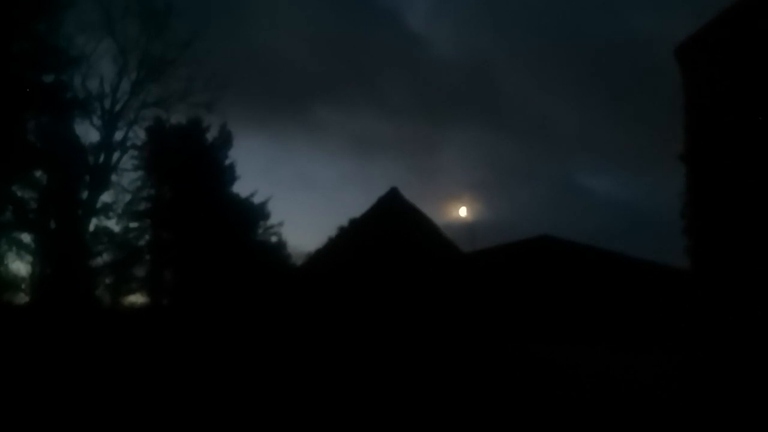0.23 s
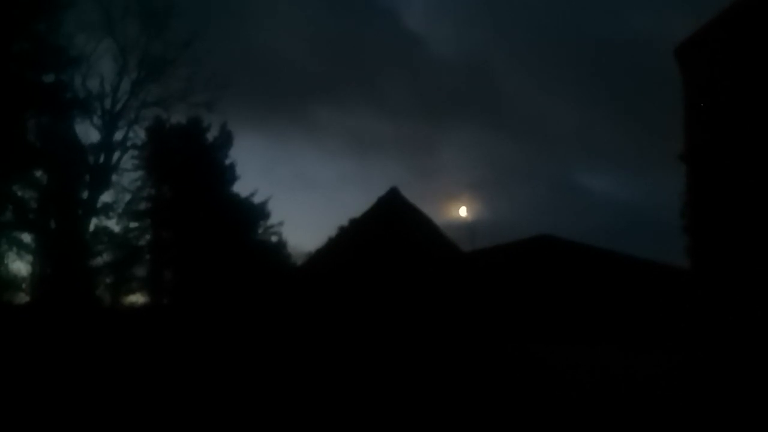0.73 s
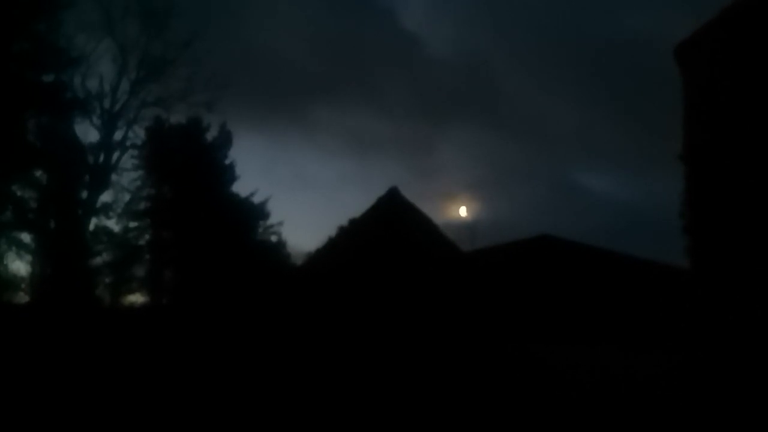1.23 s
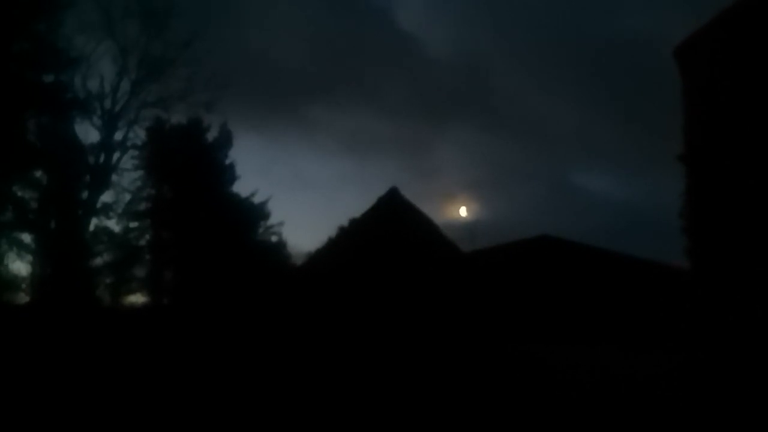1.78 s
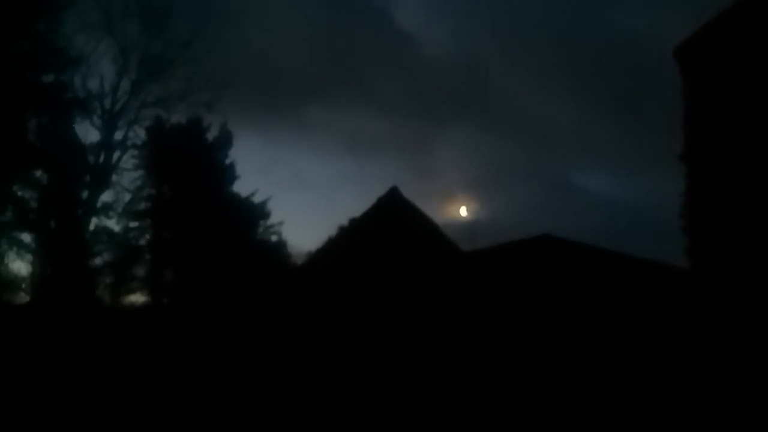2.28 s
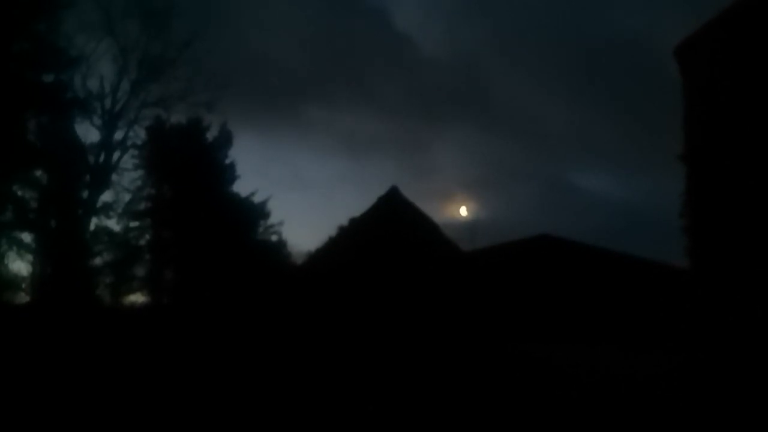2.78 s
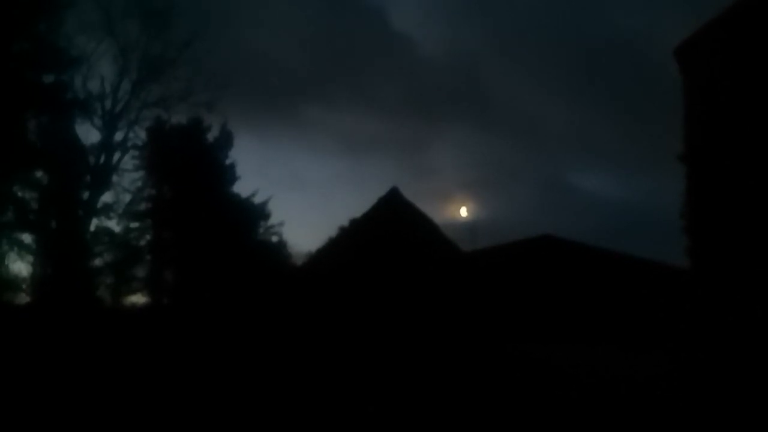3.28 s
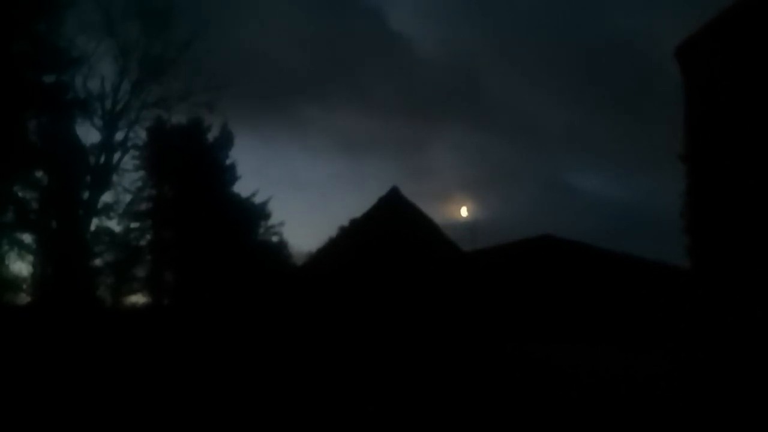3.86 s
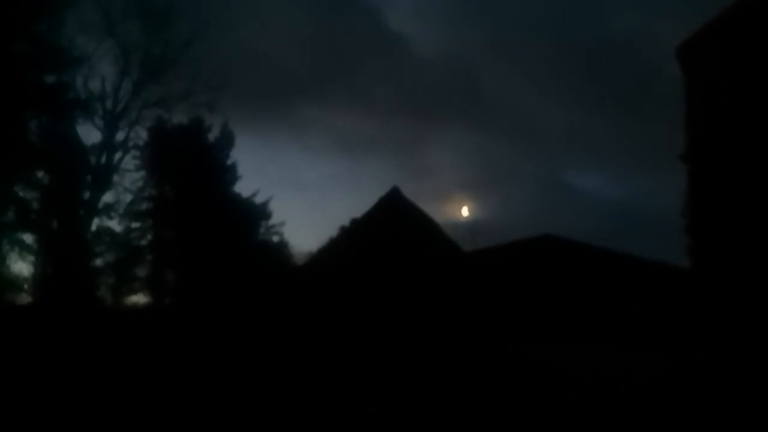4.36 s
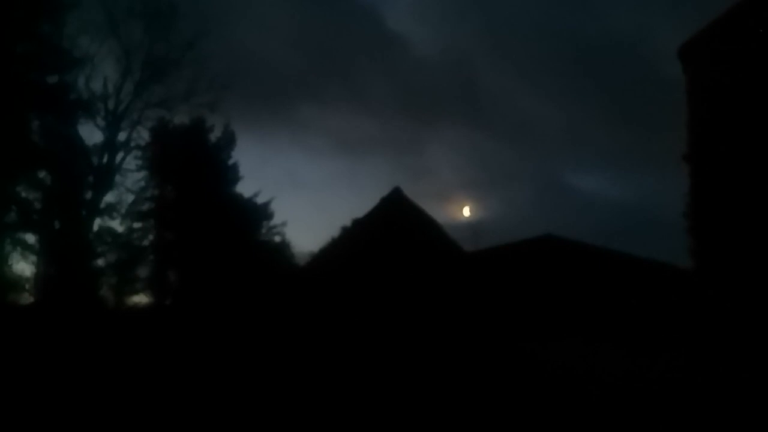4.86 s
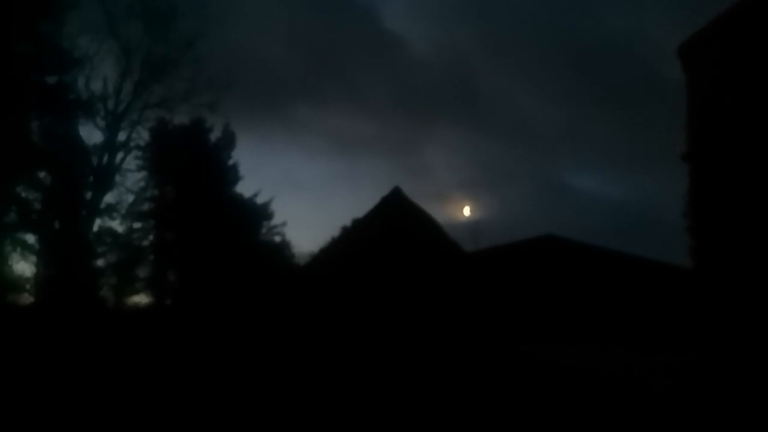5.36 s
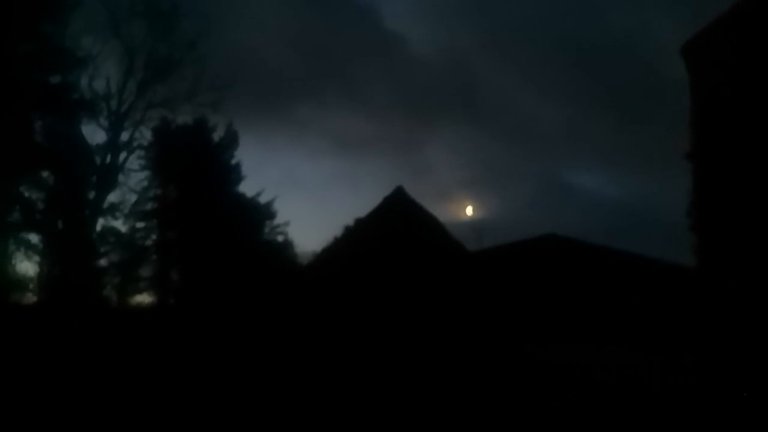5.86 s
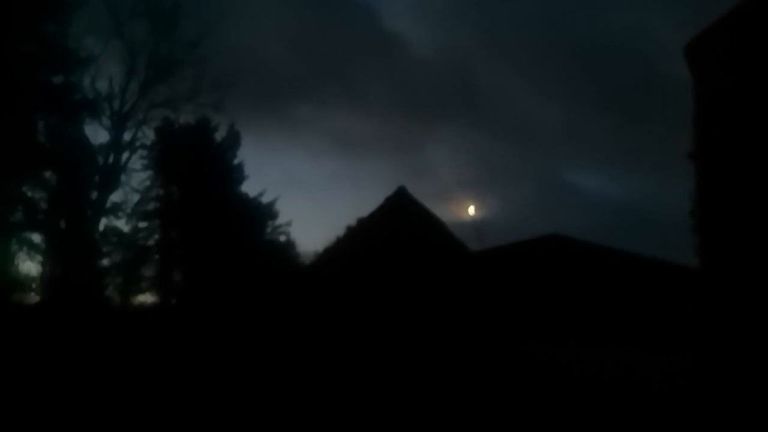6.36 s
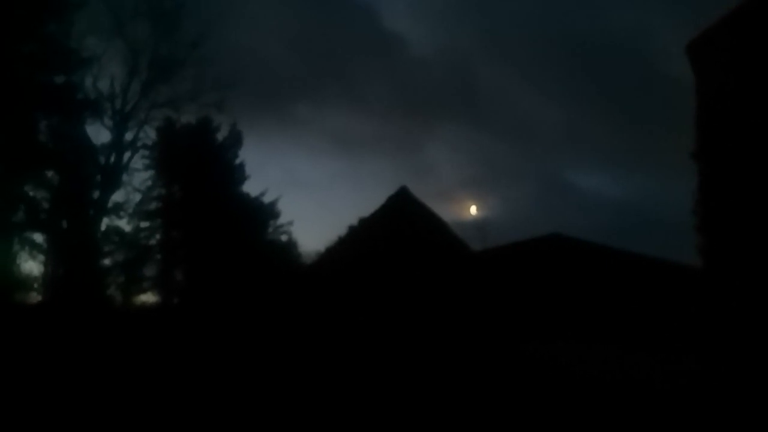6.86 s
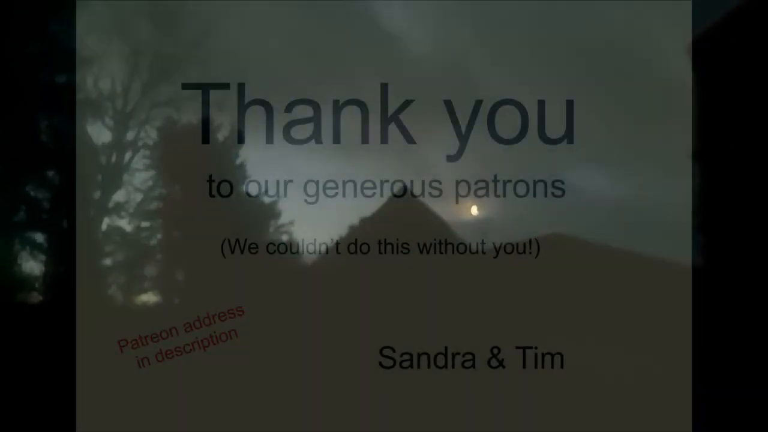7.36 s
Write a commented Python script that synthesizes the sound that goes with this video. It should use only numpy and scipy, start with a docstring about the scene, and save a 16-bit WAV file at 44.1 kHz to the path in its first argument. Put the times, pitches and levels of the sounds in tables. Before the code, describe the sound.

In a still farmyard at dawn, distant chirps flare and fade under soft knocks and clear piping. A thrush repeats a slurred whistle, high twittering follows, then a robin sings close on the right among wheezes and a fluting blackbird. Sharp whipping calls and a slowing trill come later. Walls and trees echo the birds over faint rumble, hum and hiss.

```python
"""Dawn chorus in a farmyard, in still air, over noise-band rumble, hum and hiss; walls and trees echo each call.
A flurry of far chirps fades at once amid soft knocks (noise bursts), hedge piping and single blackbird flutes.
A thrush repeats a slurred whistle, two-voiced arches twitter, then a robin close on the right sings bent tones
among trembling wheezes and buzzes and a blackbird phrase that follows a pitch curve. A far whistle sinks, the
blackbird resumes, the robin's upsweeps whip, a two-voiced trill slows and fades, and soft knocks return."""
import sys
import numpy as np
from scipy import signal
from scipy.fft import rfft, irfft, next_fast_len
from scipy.io import wavfile
from scipy.ndimage import uniform_filter1d, map_coordinates

SR = 44100
rng = np.random.default_rng(int(sys.argv[2]) if len(sys.argv) > 2 else 0)


def dump(signal):
    """Clip the signal to [-1, 1] and save it as 16-bit WAV at the path in sys.argv[1]."""
    limited = np.clip(np.atleast_2d(signal).T, -1, 1)
    pcm = np.round(limited * 32767).astype(np.int16)
    wavfile.write(sys.argv[1], SR, pcm)


N = 336042


def amp(db):
    """Decibels to amplitude gain."""
    return 10 ** (np.asarray(db) / 20)


def unit(x):
    """Scale to rms 1."""
    return x / np.sqrt(np.mean(x ** 2) + 1e-20)


def along(points, hz):
    """Read (freq_hz, value) points on a log frequency axis."""
    point_hz, value = np.transpose(points)
    return np.interp(np.log(hz + 1), np.log(point_hz + 1), value)


def wobble(knots_per_s, size):
    """Smooth random curve: a spline through Gaussian knots."""
    knots = rng.standard_normal(2048)
    return map_coordinates(knots, [np.arange(size) * knots_per_s / SR], mode="wrap")


def filtered(x, response):
    """Multiply the spectrum of x by a response of frequency."""
    size = next_fast_len(N + SR // 4)
    hz = np.fft.rfftfreq(size, 1 / SR)
    return irfft(rfft(x, size) * response(hz), size)[..., :N]


def late(x, delay_ms):
    """Delay x by whole samples."""
    return np.pad(x, (round(delay_ms * SR / 1000), 0))[:N]


def add(track, start_s, sound):
    """Mix a sound into a track in place."""
    part = track[max(round(start_s * SR), 0):][:len(sound)]
    part += sound[:len(part)]


def sides(right_db):
    """Left and right gains of mean power 1; right_db is right over left."""
    return unit(amp([[0], [right_db]]))


# Channel correlation of the noises: freq_hz, correlation (-1 to 1)
STEREO_CORRELATION = [(30, 0.99), (60, 1), (130, 0.92), (260, 0.56), (550, -0.67), (1100, -0.11),
                      (4000, 0.02)]


def rush(spectrum):
    """Stereo noise of rms 1; mid and side shares set the channel correlation at each frequency."""
    def mid_side_response(hz):
        angle = np.arccos(np.clip(along(STEREO_CORRELATION, hz), -1, 1)) / 2
        return amp(along(spectrum, hz)) * [np.cos(angle), np.sin(angle)]
    mid, side = filtered(rng.standard_normal((2, N)), mid_side_response)
    return unit(np.array([mid + side, mid - side]))


def whistle(hz, waver, knots_per_s):
    """One side of the syrinx: a sine of rms 1 whose pitch trembles by the fraction waver."""
    pitch_hz = hz * (1 + waver * wobble(knots_per_s, len(hz)))
    return np.sqrt(2) * np.sin(2 * np.pi * np.cumsum(pitch_hz) / SR)


def bent(rows, start_ratio, end_ratio):
    """Give (start_s, length_s, middle_hz, level_db) rows one shared pitch bend."""
    return [(s, length_s, hz * start_ratio, hz, hz * end_ratio, db) for s, length_s, hz, db in rows]


def sing(notes, waver, knots_per_s, taper=0.37):
    """Notes (start_s, length_s, start_hz, middle_hz, end_hz, level_db) bend parabolically, with tapered ends."""
    song = np.zeros(N)
    for s, length_s, start_hz, middle_hz, end_hz, db in notes:
        u = np.linspace(0, 1, max(int(length_s * SR), 64))
        parabola = np.polyfit([0, 0.5, 1], [start_hz, middle_hz, end_hz], 2)
        tone = whistle(np.polyval(parabola, u), waver, knots_per_s)
        add(song, s, amp(db) * signal.windows.tukey(len(u), taper) * tone)
    return song


def upper_voice(notes, ratio, stretch, gain_db):
    """The other side of the syrinx: the same arch, higher, with its length scaled about its centre."""
    return [(s - length_s * (stretch - 1) / 2, length_s * stretch, a * ratio, b * ratio, c * ratio, db + gain_db)
            for s, length_s, a, b, c, db in notes]


def phrase(curve, gain_db, waver, knots_per_s):
    """One unbroken warble along a (time_s, pitch_hz, level_db) curve."""
    song = np.zeros(N)
    when_s, hz, db = np.transpose(curve)
    t = np.arange(when_s[0], when_s[-1], 1 / SR)
    tone = whistle(np.interp(t, when_s, hz), waver, knots_per_s)
    level = amp(gain_db + np.interp(t, when_s, db))
    add(song, when_s[0], level * signal.windows.tukey(len(t), 0.04) * tone)
    return song


def yard(song, right_db, wet_db, walls_t60_s, trees_db, trees_t60_s=2.25, echo_right_db=3, build_s=0.0015):
    """Direct sound, a quick scatter from walls and a long one from trees; treble dies sooner."""
    hz, t, noise = signal.stft(rng.standard_normal((2, SR)), SR, nperseg=256)
    air_loss_db = 30 * t * (hz[:, None] / 8000) ** 2
    walls = amp(-60 * t / walls_t60_s)
    trees = amp(trees_db - 60 * t / trees_t60_s)
    decay = (walls + trees) * (1 - np.exp(-t / build_s))
    tail = signal.istft(noise * decay * amp(-air_loss_db), SR, nperseg=256)[1]
    tail /= np.sqrt(np.sum(decay ** 2) * t[1] * SR)
    echo = signal.fftconvolve(song[None], tail, axes=1)[:, :N]
    direct = sides(right_db) * np.array([late(song, delay_ms=0.57), song])  # left lags
    return (direct + amp(wet_db) * sides(echo_right_db) * echo) / np.hypot(1, amp(wet_db))


# Distant rumble spectrum: freq_hz, relative_db_per_hz
RUMBLE_SPECTRUM = [(12, -28), (20, -1), (29, 2.5), (39, -10), (60, -8.5), (85, -8), (125, -10),
                   (200, -15.5), (300, -20), (450, -24), (700, -32), (1300, -100)]
# Hiss spectrum: freq_hz, relative_db_per_hz
HISS_SPECTRUM = [(300, -14), (550, 1.5), (1000, 4), (1600, 2), (3000, -8), (5000, -5), (7000, -6.5),
                 (9000, -11), (15500, -11)]


def background(rumble_db=-58, hum_db=-59, hiss_db=-64):
    """Steady noises: distant rumble, a narrow wavering band near 50 Hz as hum, and hiss."""
    hum = rush([(20, -60), (42, -18), (50, -2), (54, 0), (66, -17), (130, -70), (400, -120)])
    return amp(rumble_db) * rush(RUMBLE_SPECTRUM) + amp(hum_db) * hum + amp(hiss_db) * rush(HISS_SPECTRUM)


# Soft knocks: start_s, fall_30db_s, level_db
SOFT_KNOCKS = [(0.024, 0.049, -55), (0.262, 0.039, -50), (7.104, 0.17, -46), (7.123, 0.086, -80)]
# Small dry ticks: start_s, level_db
DRY_TICKS = [(1.249, -61), (3.982, -51), (7.547, -57)]
# Knock spectrum: freq_hz, relative_db
KNOCK_SPECTRUM = [(40, -1), (90, -3), (280, 0), (480, -11), (800, -1.5), (1400, -16.5), (2000, -3.5),
                  (3500, -42), (8000, -63)]


def knocks():
    """Dull bumps and dry ticks close to the microphone: decaying bursts of coloured noise."""
    t = np.arange(SR // 2) / SR
    bumps, ticks = np.zeros(N), np.zeros(N)
    for s, fall_30db_s, db in SOFT_KNOCKS:
        add(bumps, s, amp(db - 30 * t / fall_30db_s) * (1 - np.exp(-t / 0.0013)))
    for s, db in DRY_TICKS:
        add(ticks, s, amp(db - 60 * t / 0.02))
    tick_noise = rush([(2000, -31), (4500, 2), (7000, 9), (10000, -39)])
    return sides(3.4) * (bumps * rush(KNOCK_SPECTRUM) + ticks * tick_noise)


# Distant chorus spectrum: freq_hz, relative_db_per_hz
FAR_SPECTRUM = [(1200, -17), (1750, -2.5), (2400, -3.5), (3600, -2.5), (4500, -13), (6000, -15.5),
                (7500, -26.5), (9000, -49)]


def far_chorus(count=160, level_db=-60.5, swell_db=-1, chirps_db=-9, patchy_db=3, flurry_db=9, flurry_s=0.18):
    """Many distant birds: faint echoing chirps in a shimmering noise wash, with an opening flurry that dies away."""
    notes = []
    for when, length, height, bend, fall, strength in rng.random((count, 6)):
        hz = 2000 * 3 ** height
        start_hz = hz * (1 + 0.307 * (bend - 0.5))
        end_hz = hz * (1 + 0.42 * (fall - 0.5))
        notes.append((when * N / SR, 0.0198 + 0.041 * length, start_hz, hz, end_hz, 6 * strength))
    song = filtered(sing(notes, waver=0.02, knots_per_s=320), lambda hz: amp(along(FAR_SPECTRUM, hz)))
    chirps = unit(yard(song, right_db=-7, wet_db=11, walls_t60_s=0.57, trees_db=-8))

    grid = signal.stft(rush(FAR_SPECTRUM), nperseg=512)[2]
    patches = uniform_filter1d(rng.standard_normal(grid.shape[1:]), size=3, axis=0)  # across frequency
    patches = uniform_filter1d(patches, size=16, axis=1)  # across time
    wash = unit(signal.istft(grid * amp(patchy_db * unit(patches)), nperseg=512)[1][:, :N])

    flurry = flurry_db * np.exp(-np.arange(N) / SR / flurry_s)
    gain = amp(level_db + swell_db * wobble(3.16, N) + flurry)
    return gain * (sides(0.93) * wash + amp(chirps_db) * chirps)


# Whistle that sinks as it swells: time_s, pitch_hz, level_db (before gain_db)
FAR_WHISTLE_CURVE = [(5.27, 7300, -70), (5.47, 7070, -60.5), (5.55, 7110, -62)]


def far_whistle():
    """A thin high far note: one sine along a sinking pitch curve."""
    song = phrase(FAR_WHISTLE_CURVE, gain_db=-1, waver=0.01, knots_per_s=300)
    return yard(song, right_db=23, wet_db=5, walls_t60_s=0.3, trees_db=-14)


# Wheezes, which arch up and sink back: start_s, length_s, middle_hz, level_db
WHEEZE_NOTES = [(1.395, 0.069, 3870, -50), (3.055, 0.086, 5355, -51.5), (3.095, 0.15, 5780, -60),
                (3.38, 0.052, 5900, -56), (3.575, .15, 5240, -51.5), (3.585, .2, 5980, -57.5),
                (3.87, .11, 8600, -68.5), (4.55, 0.15, 4320, -60)]
# Buzzes: start_s, length_s, middle_hz, end_over_start_pitch, level_db
BUZZ_NOTES = [(2.526, 0.058, 3633, 1.6, -46.5), (2.61, .11, 4290, 1.5, -55), (3.34, .28, 6740, .87, -63.5),
              (4.22, 0.13, 5410, 0.6, -63), (6.699, 0.103, 4685, 1.03, -56), (7.268, .22, 7200, 1, -70.5),
              (7.324, 0.27, 3990, 0.99, -58.5)]


def buzzes():
    """A fast tremble spreads each tone into a band: slight in the wheezes, deep in the buzzes."""
    wheezes = bent(WHEEZE_NOTES, start_ratio=0.94, end_ratio=0.94)
    glides = [(s, length_s, hz / np.sqrt(rise), hz, hz * np.sqrt(rise), db)
              for s, length_s, hz, rise, db in BUZZ_NOTES]
    song = sing(wheezes, waver=0.021, knots_per_s=520) + sing(glides, waver=0.062, knots_per_s=700)
    return yard(song, right_db=30, wet_db=4, walls_t60_s=0.92, trees_db=-18, echo_right_db=4.5)


# Single fluted notes: start_s, length_s, middle_hz, level_db
FLUTE_NOTES = [(.025, .14, 2410, -43.5), (.05, 0.1, 2840, -49.5), (.74, 0.053, 2580, -49),
               (1.12, 0.13, 1990, -54.5), (1.28, 0.079, 1760, -57), (1.33, 0.072, 2434, -50),
               (2.29, 0.048, 1912, -48.5), (3.53, 0.082, 1790, -60)]
# Long phrases, in order: time_s, pitch_hz, level_db (before gain_db)
OPENING_CURVE = [(2.735, 1940, -61), (2.745, 1960, -52.5), (2.967, 1950, -52), (3.097, 2140, -65),
                 (3.115, 2150, -55), (3.167, 1980, -49.5), (3.21, 2000, -55)]
UPTURN_CURVE = [(5.28, 2084, -70), (5.304, 2050, -43.5), (5.336, 2260, -51), (5.35, 2298, -46),
                (5.39, 2270, -57)]
MAIN_CURVE = [(5.425, 2920, -53), (5.443, 2793, -44.5), (5.547, 2491, -45), (5.643, 2698, -47),
              (5.771, 2776, -44.5), (5.965, 2788, -47.5), (6.223, 2550, -49.5), (6.257, 2583, -47),
              (6.325, 2728, -54), (6.373, 2670, -51), (6.403, 2347, -45.5), (6.441, 2466, -47.5),
              (6.495, 2259, -51.5), (6.55, 2363, -55)]
CLOSING_CURVE = [(6.61, 2170, -42), (6.644, 1950, -56.5), (6.818, 2030, -56), (7.078, 2181, -49.5),
                 (7.242, 2167, -68), (7.26, 2210, -68), (7.288, 2102, -59), (7.316, 1868, -55),
                 (7.4, 1875, -54)]


def blackbird():
    """Low fluting from the trees, heard mostly as echo: sagging notes and phrases of wavering sine."""
    song = sing(bent(FLUTE_NOTES, start_ratio=1.04, end_ratio=0.92), waver=0.03, knots_per_s=230, taper=0.5)
    song += phrase(OPENING_CURVE, gain_db=2.5, waver=0.0553, knots_per_s=200)
    song += phrase(UPTURN_CURVE, gain_db=4.5, waver=0.015, knots_per_s=220)
    song += phrase(MAIN_CURVE, gain_db=2.5, waver=0.04, knots_per_s=150)
    song += phrase(CLOSING_CURVE, gain_db=3, waver=0.0303, knots_per_s=150)
    return yard(song, right_db=8.5, wet_db=5.5, walls_t60_s=0.46, trees_db=-10.5, echo_right_db=2, build_s=0.0052)


# Whistle shape: time_s (before stretch), pitch_hz, relative_db
SLUR_SHAPE = [(0, 2524, 2.5), (.022, 3050, -3.5), (0.042, 3400, -8.5), (.062, 3330, 4), (.08, 2900, 1.5),
              (0.102, 2654, 5.5), (.15, 2560, -3.5), (0.192, 2366, 2), (.215, 2044, -6)]
# Repeats: start_s, stretch_ratio, gain_db
THRUSH_REPEATS = [(0.471, 0.77, -41), (1.051, 0.85, -40.5), (1.499, 0.86, -41)]


def thrush():
    """One sine whistle, flicked up and drawn down, repeated from across the yard."""
    song = np.zeros(N)
    when_s, hz, shape_db = np.transpose(SLUR_SHAPE)
    for s, stretch, gain_db in THRUSH_REPEATS:
        t = np.arange(int(when_s[-1] * stretch * SR)) / SR / stretch
        tone = whistle(np.interp(t, when_s, hz), waver=0.012, knots_per_s=330)
        level = amp(gain_db + np.interp(t, when_s, shape_db))
        add(song, s, level * signal.windows.tukey(len(t), 0.1) * tone)
    return yard(song, right_db=7, wet_db=8.5, walls_t60_s=0.33, trees_db=-18, echo_right_db=2, build_s=0.021)


# Two-voiced arches: start_s, lower_voice_hz, level_db
ARCH_NOTES = [(1.774, 7380, -57.5), (1.836, 7440, -56), (1.89, 7100, -52.5), (1.973, 7380, -53.5),
              (2.037, 7130, -52.5), (2.146, 7260, -56.5), (2.209, 7170, -51)]
# Thin whistles, then thin down-strokes: start_s, length_s, middle_hz, level_db
THIN_WHISTLE_NOTES = [(.76, 0.31, 7800, -72), (1.615, 0.029, 7600, -59), (1.725, 0.018, 7706, -59),
                      (4.035, .065, 8220, -70), (4.190, .076, 8200, -66), (4.855, 0.077, 7900, -67),
                      (5.478, 0.084, 5500, -61.5)]
THIN_STROKE_NOTES = [(1.350, 0.03, 7130, -61.5), (1.663, .018, 7100, -57.5), (2.130, .049, 6100, -62.5),
                     (2.210, 0.051, 5900, -59.5)]


def high_twitter(arch_s=0.03):
    """Thin whistles further off and a run of arches sung with both sides of the syrinx."""
    lower = bent([(s, arch_s, hz, db) for s, hz, db in ARCH_NOTES], start_ratio=0.91, end_ratio=0.88)
    upper = upper_voice(lower, ratio=1.124, stretch=1.5, gain_db=-9.5)
    arches = sing(lower + upper, waver=0.0037, knots_per_s=320)
    thin = bent(THIN_WHISTLE_NOTES, start_ratio=1.01, end_ratio=0.92)
    thin += bent(THIN_STROKE_NOTES, start_ratio=1.07, end_ratio=0.89)
    whistles = sing(thin, waver=0.0068, knots_per_s=240)
    return (yard(arches, right_db=9.5, wet_db=-4, walls_t60_s=0.24, trees_db=-27)
            + yard(whistles, right_db=24, wet_db=-0.5, walls_t60_s=0.98, trees_db=-4))


# Trill syllables: start_s
TRILL_STARTS = [6.125, 6.175, 6.222, 6.276, 6.348, 6.431, 6.508]


def hedge_trill(pitch_hz=3567, first_db=-34, fade_db=-2, syllable_s=0.032, growth=1.06):
    """Two voices beat against each other in syllables that slow, fade and lengthen."""
    rows = [(s, syllable_s * growth ** k, pitch_hz, first_db + k * fade_db) for k, s in enumerate(TRILL_STARTS)]
    lower = bent(rows, start_ratio=0.93, end_ratio=0.876)
    upper = upper_voice(lower, ratio=1.11, stretch=0.92, gain_db=-2)
    song = sing(lower + upper, waver=0.018, knots_per_s=448)
    return yard(song, right_db=14, wet_db=3, walls_t60_s=0.091, trees_db=-17.5, echo_right_db=2.5)


# Arched whistles, steep down-slides, low pipes: start_s, length_s, middle_hz, level_db
HEDGE_WHISTLE_NOTES = [(.015, 0.035, 3906, -50.5), (.220, 0.12, 3720, -58), (4.34, 0.095, 3770, -58.5),
                       (4.418, .16, 3610, -52.5), (4.635, 0.2, 3760, -57.5), (4.770, 0.09, 3544, -52),
                       (5.043, 0.024, 3910, -49), (5.075, 0.026, 3740, -42.5), (5.2, .38, 3613, -55),
                       (5.25, 0.24, 3350, -59.5), (6.085, 0.034, 3930, -40.5), (6.620, .18, 3670, -57.5),
                       (6.98, .4, 3685, -65), (7.340, 0.044, 3410, -53.5), (7.41, .1, 3520, -57.5)]
HEDGE_SLIDE_NOTES = [(5.117, .028, 3357, -40.5), (6.790, .088, 2580, -50), (7.200, .1, 2594, -52.5)]
PIPE_NOTES = [(0, 0.02, 2780, -39), (.1, 0.059, 2338, -41), (1.450, .12, 2085, -52),
              (1.900, .28, 2323, -52), (3.045, 0.039, 2300, -44), (3.108, 0.031, 2290, -42),
              (3.420, 0.13, 2315, -61)]


def hedge_bird():
    """Bent sine whistles, slides and clear low piping, and an upward chirp that opens the trill."""
    notes = bent(HEDGE_WHISTLE_NOTES, start_ratio=0.95, end_ratio=0.91)
    notes += bent(HEDGE_SLIDE_NOTES, start_ratio=1.4, end_ratio=0.84)
    notes += bent([(6.082, 0.013, 4310, -39.5)], start_ratio=0.84, end_ratio=1.2)  # chirp
    pipes = bent(PIPE_NOTES, start_ratio=1.012, end_ratio=0.96)
    song = sing(notes, waver=0.009, knots_per_s=200) + sing(pipes, waver=0.0055, knots_per_s=220)
    whistles = yard(song, right_db=7.5, wet_db=2.5, walls_t60_s=0.3, trees_db=-9.5, echo_right_db=0.5)
    return whistles + hedge_trill()


def scoop(rows):
    """Bend notes into rising scoops."""
    return bent(rows, start_ratio=0.92, end_ratio=1.04)


def pip(rows):
    """Keep notes almost level."""
    return bent(rows, start_ratio=1.006, end_ratio=1.003)


# "Tee-oo" calls: start_s, scoop_hz, scoop_db, answer_after_s, answer_length_s
TEE_OO_CALLS = [(3.178, 3665, -36.5, .066, .035), (3.342, 3520, -40.5, .105, 0.087)]


def tee_oos(tee_s=0.0458, oo_hz=2950, oo_db=-50.5, flick_s=0.018, flick_db=-51):
    """A loud scoop and a soft low answer; the voice flicks down into each."""
    scoops = scoop([(s, tee_s, hz, db) for s, hz, db, _, _ in TEE_OO_CALLS])
    answers = pip([(s + after_s, length_s, oo_hz, oo_db) for s, _, _, after_s, length_s in TEE_OO_CALLS])
    end_ratio = 0.86  # each flick ends on the start pitch of its note
    flicks = [(s - 0.8 * flick_s, flick_s, start_hz / end_ratio, flick_db)
              for s, _, start_hz, *_ in scoops + answers]
    return scoops + answers + bent(flicks, start_ratio=1.24, end_ratio=end_ratio)


# Whip calls: start_s (last upsweep), level_db, high_note_after_s, high_note_length_s
WHIP_CALLS = [(5.654, -35, 0.067, 0.023), (5.802, -32.5, 0.029, 0.055), (5.949, -33, .058, 0.0225)]


def whips(count=4, sweep_s=0.016, sweep_hz=6610, lead_s=0.0096, lead_db=-8, lead_pitch_ratio=0.94):
    """Ever stronger and higher upsweeps in quick succession, closed by a high falling note."""
    notes = []
    for s, db, after_s, length_s in WHIP_CALLS:
        sweeps = [(s - k * lead_s, sweep_s, sweep_hz * lead_pitch_ratio ** k, db + k * lead_db)
                  for k in range(count)]
        notes += bent(sweeps, start_ratio=0.68, end_ratio=1.254)
        notes += bent([(s + after_s, length_s, 7895, -39.5)], start_ratio=1.04, end_ratio=0.92)
    return notes


# Falling slurs, rising scoops, level pips: start_s, length_s, middle_hz, level_db
SLUR_NOTES = [(2.305, 0.0221, 4300, -44), (2.350, 0.038, 2900, -50.5), (2.322, .018, 3410, -54),
              (2.341, .018, 3700, -47), (2.470, 0.046, 2840, -51.5), (4.010, 0.023, 5450, -46),
              (4.036, 0.03, 3930, -45)]
SCOOP_NOTES = [(3.705, 0.061, 4380, -50), (3.850, 0.096, 4260, -53), (3.912, 0.0277, 4100, -43)]
PIP_NOTES = [(2.452, 0.012, 4020, -43.5), (2.495, .047, 3700, -51.5), (2.553, .015, 3950, -40.5),
             (2.790, 0.056, 7780, -50), (2.840, .1, 7850, -57.5), (2.980, 0.036, 7540, -46.5),
             (4.087, 0.0271, 3560, -45), (4.108, .045, 3356, -48.5)]


def robin():
    """Near and clear: quick bent sines, thin high notes and whip-like upsweeps."""
    notes = bent(SLUR_NOTES, start_ratio=1.11, end_ratio=0.85) + scoop(SCOOP_NOTES) + pip(PIP_NOTES) + tee_oos()
    warble = sing(notes, waver=0.008, knots_per_s=460)
    calls = sing(whips(), waver=0.013, knots_per_s=705)
    return (yard(warble, right_db=13.5, wet_db=-2, walls_t60_s=0.3, trees_db=-15.5, build_s=0.00075)
            + yard(calls, right_db=17, wet_db=-2, walls_t60_s=0.58, trees_db=-22, echo_right_db=11.5,
                   build_s=0.00059))


def scene():
    """All the birds over the quiet of the farm."""
    far = background() + knocks() + far_chorus() + far_whistle()
    return far + buzzes() + blackbird() + thrush() + high_twitter() + hedge_bird() + robin()


def record(dry, top_hz=15700):
    """Band limit: nothing passes at or above top_hz."""
    return filtered(dry, lambda hz: hz < top_hz)


dry = scene()
out = record(dry)
dump(out)
```